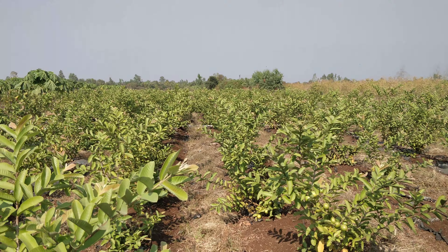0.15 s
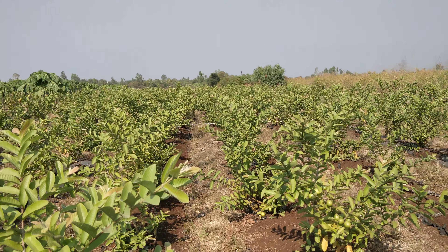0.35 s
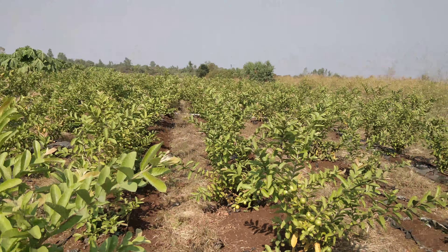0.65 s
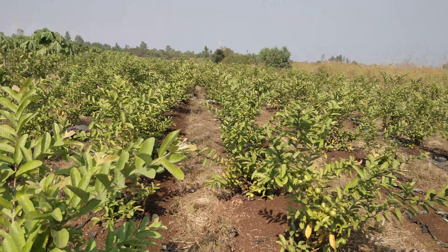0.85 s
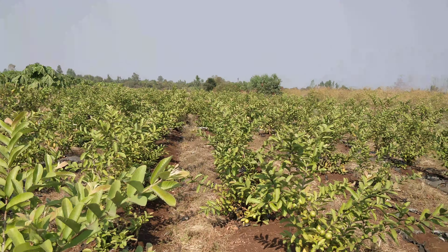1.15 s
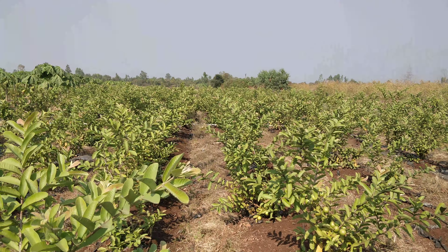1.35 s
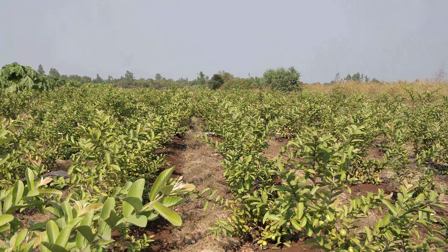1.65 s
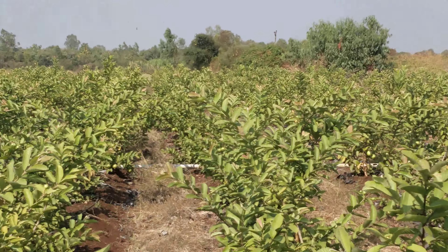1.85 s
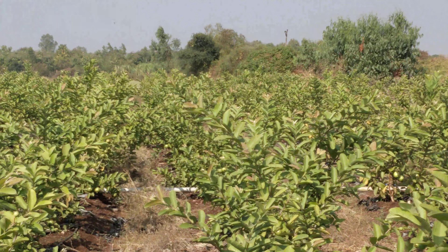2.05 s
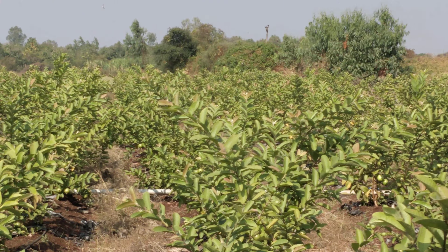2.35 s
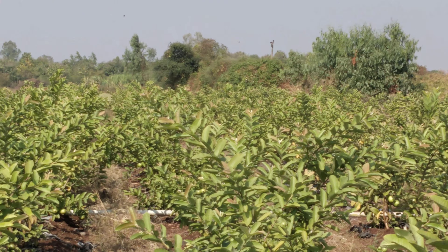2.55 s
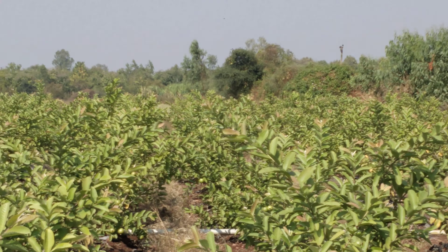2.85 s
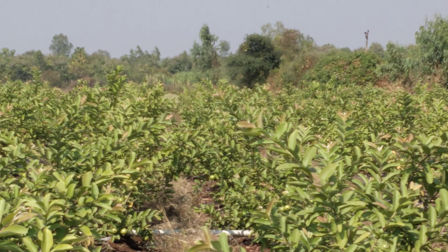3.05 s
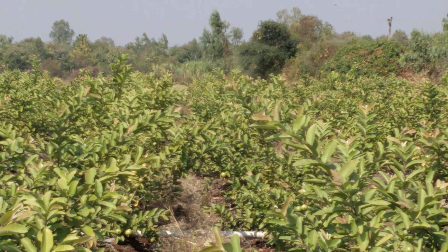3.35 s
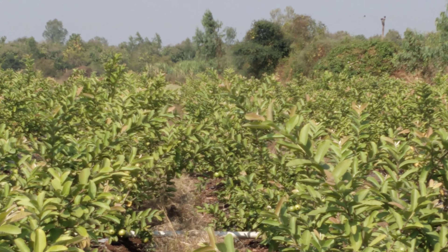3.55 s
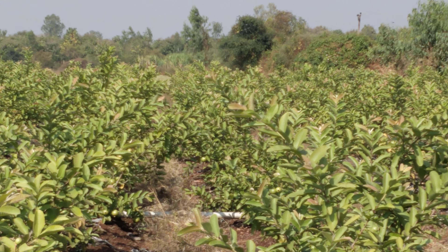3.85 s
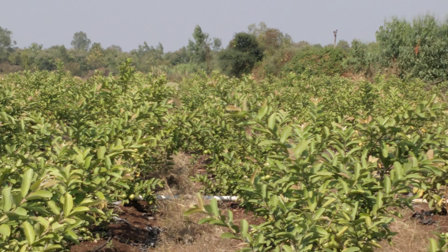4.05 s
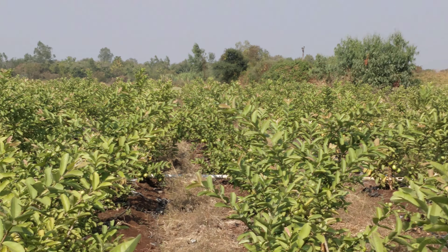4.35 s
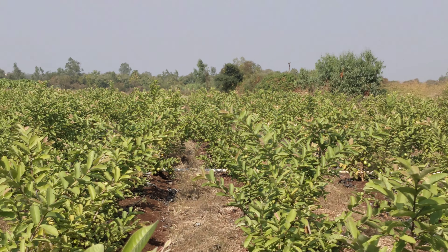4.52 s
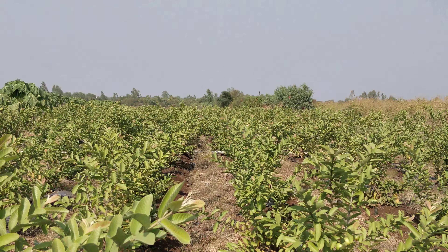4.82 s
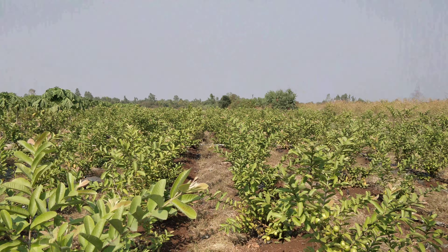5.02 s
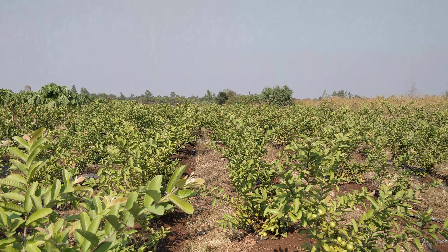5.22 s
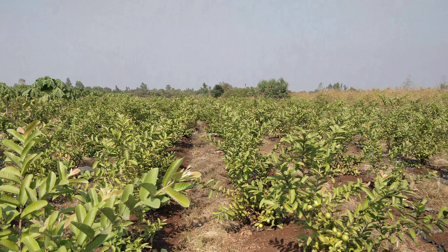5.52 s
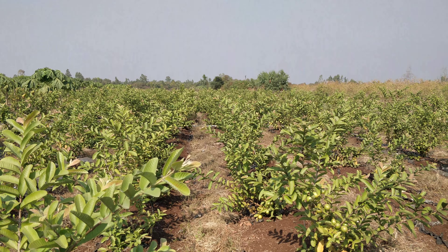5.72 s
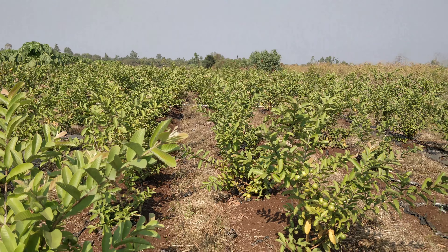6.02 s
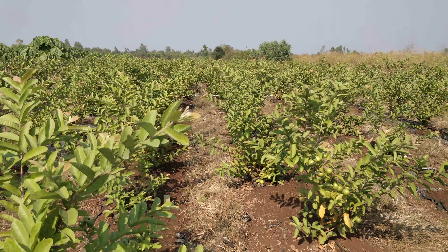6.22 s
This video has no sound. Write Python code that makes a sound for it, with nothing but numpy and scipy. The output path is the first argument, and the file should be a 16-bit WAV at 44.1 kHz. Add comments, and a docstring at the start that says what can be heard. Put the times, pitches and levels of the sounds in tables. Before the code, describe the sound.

A cricket chirps fast and very high on the right in a breezy field, after an opening burst of finger rubs and knocks on the phone.

```python
"""A cricket chirps in a dry field, close on the right of a hand-held phone: gliding tones, echoes and leaf scatter.
Fingers rub and tick on the case: banded grainy noise and short damped rings. Wind thumps the microphone
ports, mostly the left one: lumpy low noise and bell-shaped pulses. Small birds whistle short glides; other
crickets, steady air and a far drone of three noise bands fill the distance."""
import sys
import numpy as np
from scipy import signal
from scipy.fft import rfft, irfft, next_fast_len
from scipy.io import wavfile
from scipy.ndimage import uniform_filter1d, map_coordinates

SR = 44100
rng = np.random.default_rng(int(sys.argv[2]) if len(sys.argv) > 2 else 0)


def output_pcm(signal):
    """Save a mono or channel-first signal as 16-bit PCM at the path in sys.argv[1].

    Samples are clipped to [-1, 1] before scaling.
    """
    pcm = np.clip(np.atleast_2d(signal).T, -1, 1) * 32767
    wavfile.write(sys.argv[1], SR, np.round(pcm).astype(np.int16))


N = 281358  # samples


def amp(db):
    """Amplitude ratio of a level in dB."""
    return 10 ** (np.asarray(db) / 20)


def unit(x):
    """x scaled to rms 1 over all its channels."""
    return x / np.sqrt(np.mean(x ** 2) + 1e-20)


def along(points, hz):
    """(f/Hz, value) points interpolated on a log frequency axis."""
    f, v = np.transpose(points)
    return np.interp(np.log(hz + 1), np.log(f + 1), v)


def curves(rows):
    """One value per sample for each column after the time."""
    s, *cols = np.transpose(rows)
    return [np.interp(np.arange(N) / SR, s, c) for c in cols]


def wobble(rate_hz):
    """Smooth random curve, rate_hz knots a second."""
    knots = rng.standard_normal(int(N / SR * 400) + 4)
    return map_coordinates(knots, [np.arange(N) * rate_hz / SR])


def filtered(x, response):
    """x times a response of frequency."""
    m = next_fast_len(N + SR // 2)
    return irfft(rfft(x, m) * response(np.fft.rfftfreq(m, 1 / SR)), m)[..., :N]


def noise(spectrum, alike):
    """Stereo noise of rms 1; mid and side shares set the correlation; falls away outside the spectrum's points."""
    closed = [(spectrum[0][0] / 2, -90), *spectrum, (spectrum[-1][0] * 1.3, -90)]

    def mid_side(hz):
        turn = np.arccos(np.clip(along(alike, hz), -1, 1)) / 2
        return amp(along(closed, hz)) * [np.cos(turn), np.sin(turn)]

    mid, side = filtered(rng.standard_normal((2, N)), mid_side)
    return unit(np.array([mid + side, mid - side]))


def add(track, s, sound):
    """Mix a sound in at s seconds."""
    i = int(np.clip(round(s * SR), 0, N))
    track[..., i:i + sound.shape[-1]] += sound[..., :track.shape[-1] - i]


def foliage(x, t60_s):
    """Scattering from leaves and soil: decaying noise, different at each port, redrawn every sixth of a second."""
    t, step, out = np.arange(SR // 5) / SR, SR // 6, np.zeros((2, N))
    for i in range(0, N, step):
        tail = rng.standard_normal((2, len(t))) * amp(-60 * t / t60_s) * (t > .002)
        tail = tail / np.linalg.norm(tail[0])
        add(out, i / SR, signal.fftconvolve(x[:, i:i + step], tail, axes=1))
    return out


# One wing stroke, before pitch and stretch: t/s, f/Hz, level/dB
STROKE_GLIDE = [(0, 10250, -40), (.0015, 10100, -5), (.0068, 9760, 1.5), (.0085, 9450, -3),
                (.012, 9150, -6), (.015, 8600, -17), (.018, 8200, -40)]


def stroke(pitch, stretch):
    """One closing of the wings: a tone that swells, then falls in pitch and stutters as the scraper slows."""
    s, hz, db = np.transpose(STROKE_GLIDE)
    t = np.arange(0, s[-1], 1 / (SR * stretch))
    swell = uniform_filter1d(uniform_filter1d(amp(np.interp(t, s, db)), size=25), size=25)
    slips = map_coordinates(rng.standard_normal(20), [t * 850])
    stutter = 1 + np.clip((t - .007) / .003, 0, 1) * (.45 * slips - .4)
    phase = 2 * np.pi * np.cumsum(pitch * np.interp(t, s, hz)) / SR
    return np.sqrt(2) * swell * stutter * np.sin(phase)


# Near cricket's chirps: t/s, direct right level/dB
CHIRPS = [(0.0082, -52.5), (0.159, -51), (0.342, -54), (0.5167, -78), (0.688, -50), (0.859, -69),
          (1.026, -46), (1.1925, -46), (1.361, -42), (1.5342, -41.5), (1.703, -39.5), (1.8689, -42.5),
          (2.034, -43.5), (2.21, -43), (2.3796, -44.5), (2.55, -44.5), (2.7208, -47.5), (2.889, -46),
          (3.0596, -44), (3.225, -43), (3.3923, -44.5), (3.5667, -43.5), (3.7436, -42.5), (3.916, -43.5),
          (4.093, -44), (4.278, -43.5), (4.459, -42.5), (4.626, -43), (4.7961, -42.5), (4.962, -44),
          (5.1367, -42.5), (5.3051, -43), (5.4777, -42.5), (5.65, -43.5), (5.8166, -45.5), (5.9856, -42.5),
          (6.158, -46), (6.334, -49)]
# Wing strokes of a chirp: t after its start/s, relative level/dB
CHIRP_STROKES = [(0, 0), (.0255, 0), (.053, 0)]
# Soil and near leaves, before scatter: delay t/s, relative level/dB
ECHOES = [(.0036, -12), (0.0139, -13), (.019, -16)]
LEAVES_DB_PER_OCT = -27  # shrubs scatter the lower pitches best
SHADOW_DB_PER_OCT, SHADOW_PIVOT_HZ = -17, 9000  # phone's shadow at the left port


def cricket():
    """Three strokes a chirp; close echoes beat with the falling tone, and the phone shades the left port."""
    direct, scattered = np.zeros((2, 1, N))
    for s, db in CHIRPS:
        for after_s, stroke_db in CHIRP_STROKES:
            level = amp(stroke_db + 0.64 * rng.normal())
            one = level * stroke(1 + 0.0025 * rng.normal(), 1 + 0.075 * rng.normal())
            add(direct, s + after_s, amp(db) * one)
            # a hand in the way shades echoes less
            add(scattered, s + after_s, amp(-38.5 + 0.22 * (db + 46.0)) * one)
            for late_s, echo_db in ECHOES:
                echo_s = s + after_s + late_s * (1 + 0.025 * rng.normal())
                add(direct, echo_s, amp(db + echo_db + 2.2 * rng.normal()) * one)

    def octaves(hz, pivot_hz):
        return np.log2(np.clip(hz, 7000, 12000) / pivot_hz)

    scattered = filtered(scattered, lambda hz: amp(LEAVES_DB_PER_OCT * octaves(hz, 9800)))
    heard = amp([[-25], [0]]) * direct
    heard = heard + amp([[-32], [-12]]) * foliage(scattered, t60_s=.06)
    heard = heard + amp([[-36], [-18]]) * foliage(scattered, t60_s=0.29)
    return filtered(heard, lambda hz: amp([[SHADOW_DB_PER_OCT], [0]] * octaves(hz, SHADOW_PIVOT_HZ)))


def patchy(x, patch_db):
    """x with random patches of gain over pitch and time."""
    z = signal.stft(x, nperseg=256)[2]
    field = rng.standard_normal(z.shape[1:])
    field = uniform_filter1d(uniform_filter1d(field, size=7, axis=0), size=5, axis=1)
    return signal.istft(z * amp(patch_db * unit(field)), nperseg=256)[1][:, :N]


# Finger strokes, levels before the swell: t/s, attack t/s, hold t/s, release t/s, scrape f/Hz,
# scrape right level/dB, scrape left level/dB, boom f/Hz, boom tilt/(dB/octave), boom right level/dB,
# boom left level/dB, hiss right level/dB, hiss tilt/(dB/octave)
RUBS = [ (.236, 0.015, 0.0029, 0.027, 2500, -60, -51.5, 302, 2.5, -49.5, -49.5, -63.5, -7),
        (.275, 0.013, .005, 0.046, 2480, -60, -59, 300, 3.5, -55.5, -58.5, -77, 0),
        (0.365, 0.046, 0.044, 0.047, 3750, -27.5, -59, 1030, 2.5, -28, -49.5, -31.5, 4.5),
        (.49, 0.097, 0.031, 0.083, 2000, -59, -73, 610, -2.5, -43, -58.5, -59, -6.5),
        (.59, 0.04, .012, .02, 2200, -53.5, -65, 1200, -1, -40.5, -51.5, -57.5, -3.5),
        (0.669, 0.011, 0.0074, 0.11, 2480, -50.5, -58, 505, -1, -38.5, -48.5, -57, -3),
        (.75, 0.058, 0.034, 0.061, 5740, -41.5, -56, 404, -2.5, -37, -45, -36.5, -6),
        (.825, 0.021, 0.019, 0.043, 5230, -58, -67, 744, -3.5, -34.5, -41.5, -72, -3),
        (0.968, 0.07, 0.061, 0.044, 5100, -43.5, -64, 1010, 4.5, -42, -57, -48.5, 5),
        (.99, 0.034, 0.016, 0.05, 3000, -53, -75, 320, -5.5, -33, -57, -40.5, 6),
        (5.22, 0.093, 0.09, 0.08, 3930, -60, -78, 500, 7, -70, -72, -67.5, 7),
        (5.36, 0.11, 0.0072, 0.11, 3980, -55, -72, 500, 10, -65, -65, -62.5, 4),
        (5.928, 0.0074, 0.0091, 0.23, 4000, -58.5, -73, 500, -5, -65, -74, -66, -1),
        (6.0, 0.081, 0.01, 0.06, 4400, -57.5, -73, 300, -5, -60, -57.5, -64, -6),
        (6.088, 0.017, 0.066, 0.058, 2500, -62, -72, 506, -5, -42.5, -67, -71, 0),
        (6.1, 0.077, 0.011, 0.12, 4250, -48.5, -69, 290, 0, -43, -62, -57, 12),
        (6.24, 0.09, .05, .05, 4400, -41, -58, 895, 1, -36.5, -51.5, -48, 19)]
# Spectrum of skin scraping: f/Hz, relative level per Hz/dB
SCRAPE_SPECTRUM = [(900, -16), (2000, -5.5), (3000, -1.5), (4600, -1.5), (5300, 0.5), (5900, -13.5),
                   (8000, -10)]
# Spectrum of the case booming: f/Hz, relative level per Hz/dB
BOOM_SPECTRUM = [(60, -20), (150, -0.5), (300, 0.5), (800, -0.5), (1600, -5), (3000, -10.5), (5500, -44)]
# Spectrum of the hiss: f/Hz, relative level per Hz/dB
HISS_SPECTRUM = [(4500, -55), (6000, -9.5), (8500, -4), (10500, -10), (12000, -21), (15500, -39)]
TOUCH_DB, SHADE_DB = 20, 6  # swell depth; extra hiss loss at the left port
SKIN_DB, SKIN_OCTAVES, HISS_PIVOT_HZ = 7, 0.55, 9000  # scrape resonance height, width
BOOM_DB, BOOM_OCTAVES = -1, 0.57  # boom resonance height (negative: a dip), width
SNAPS_PER_S, SNAP_DB, SNAP_T60_S = 90, -4, 0.0086  # skin letting go


def rubbing():
    """Skin sticks and slips over the case: grainy noise of shifting colour in its scrape, boom and hiss bands."""
    t = np.arange(N) / SR
    grain = amp(0.37 * wobble(330) + 0.7 * wobble(60))
    snaps = rng.exponential(size=N) * (rng.random(N) < SNAPS_PER_S / SR)
    decay = amp(-60 * t[:SR // 100] / SNAP_T60_S)
    crackle = 1 + amp(SNAP_DB) * signal.fftconvolve(snaps, decay)[:N]

    def grainy(spectrum):
        return unit(grain * patchy(noise(spectrum, [(300, 0.031)]), patch_db=2.0))

    scrape = unit(crackle * grainy(SCRAPE_SPECTRUM))
    body = grainy(BOOM_SPECTRUM)
    hiss = unit(crackle * grainy(HISS_SPECTRUM))
    out = np.zeros((2, N))
    for k, row in enumerate(RUBS):
        s, attack_s, hold_s, release_s, skin_hz, right_db, left_db = row[:7]
        boom_hz, boom_tilt_db, right_boom_db, left_boom_db, hiss_db, hiss_tilt_db = row[7:]
        now = t[round(s * SR):round((s + attack_s + hold_s + release_s) * SR)] - s
        # 0 while held, towards 1 at both ends
        off = np.maximum(np.maximum(1 - now / attack_s, (now - attack_s - hold_s) / release_s), 0)
        start = k * N // len(RUBS)
        fresh = slice(start, start + len(now))  # each stroke takes its own stretch of noise
        hz = np.fft.rfftfreq(len(now), 1 / SR) + 1

        def tint(x, db):
            return unit(irfft(rfft(x[:, fresh]) * amp(db), len(now)))

        skin = tint(scrape, SKIN_DB * np.exp(-(np.log2(hz / skin_hz) / SKIN_OCTAVES) ** 2))
        fizz = tint(hiss, hiss_tilt_db * np.log2(hz / HISS_PIVOT_HZ))
        boom_octaves = np.log2(hz / boom_hz)
        resonance_db = BOOM_DB * np.exp(-(boom_octaves / BOOM_OCTAVES) ** 2)
        boom = tint(body, resonance_db + boom_tilt_db * boom_octaves)
        sound = amp([[left_db], [right_db]]) * skin
        sound = sound + amp([[left_boom_db], [right_boom_db]]) * boom
        sound = sound + amp([[hiss_db + left_db - right_db - SHADE_DB], [hiss_db]]) * fizz
        add(out, s, amp(-TOUCH_DB * off ** 2) * (1 - off ** 6) * sound)
    return out


# Nails and creaks on the case: t/s, left level/dB, right level/dB, ring f/Hz, t60/s, push relative level/dB
TICKS = [ (0.246, -33, -54, 2400, 0.012, -24), (0.253, -30.5, -51, 2640, 0.013, -20),
         (0.3646, -26, -12, 5100, 0.00066, -0.5), (0.372, -33, -17.5, 2420, 0.0028, -27),
         (0.4638, -11.5, 6.5, 1490, 0.00097, -13), (0.4733, -32, -4, 2020, 0.0017, -16),
         (0.4845, -22, -13.5, 1350, 0.002, -22), (.698, 1, -16, 3300, 0.0013, -28),
         (1.509, -28.5, -42, 1450, 0.0013, 4), (3.015, -50, -48, 3900, .002, -25),
         (5.28, -56, -44, 4200, 0.0025, -25), (5.464, -50, -40, 3900, 0.0053, -22),
         (5.488, -54, -42, 4300, .006, -29), (5.935, -54, -40, 3840, 0.0046, -25),
         (5.966, -54, -41, 3700, .004, -25), (6.056, -54, -45, 2630, .003, -20),
         (6.0857, -15.5, -31, 2840, 0.00094, -3)]


def ticks():
    """Each tick is a quick pull, a short damped ring of the case and a slower push on the port."""
    out, t = np.zeros((2, N)), np.arange(SR // 100) / SR
    for s, left_db, right_db, hz, t60_s, push_db in TICKS:
        onset = 1 - np.exp(-t / .00003)
        ring = -np.sin(2 * np.pi * hz * t) * amp(-60 * t / t60_s) * onset
        push = amp(push_db) * np.sin(2 * np.pi * 350 * t) * amp(-60 * t / 0.0032)
        add(out, s, amp([[left_db], [right_db]]) * (ring + push))
    return out


# Strongest eddies and finger pads on a port: t/s, nominal peak level/dB, f/Hz, port (0 left, 1 right)
THUMPS = [ (0.265, -42, 87.5, 1), (0.365, -28.5, 121, 0), (0.441, -15, 244, 1), (0.462, -34, 268, 0),
          (0.94, -27.5, 145, 1), (0.948, -34, 145, 1), (0.958, -24, 149, 1), (1.029, -23, 313, 1),
          (1.085, -32.5, 180, 0), (1.104, -34, 290, 1), (1.136, -34.5, 129, 0), (1.328, -34.5, 213, 1),
          (1.427, -31.5, 199, 1), (2.089, -35, 114, 0), (2.839, -36.5, 143, 0), (2.926, -27, 151, 0),
          (2.976, -30, 141, 0), (3.109, -32, 160, 0), (3.503, -43.5, 129, 0), (3.554, -36, 106, 0),
          (3.574, -28.5, 118, 0), (3.258, -40.5, 121, 0), (3.764, -35, 102, 0), (3.859, -35.5, 134, 0),
          (3.943, -41, 92.5, 0), (3.991, -33.5, 121, 0), (4.339, -41.5, 152, 0), (4.395, -37, 173, 0),
          (4.467, -36, 147, 0), (4.526, -39.5, 162, 0), (4.544, -42, 277, 0), (4.567, -28, 213, 0),
          (4.599, -24, 194, 0), (4.615, -29, 153, 0), (4.677, -38.5, 186, 0), (4.826, -39, 110, 0),
          (5.265, -36, 90, 0), (5.287, -29, 169, 0), (5.341, -37, 112, 0), (5.611, -33, 155, 0),
          (5.845, -34.5, 162, 0), (5.873, -42, 109, 0), (6.04, -32.5, 131, 0), (6.09, -33.5, 230, 1),
          (6.296, -33.5, 143, 0), (6.317, -30, 112, 0)]
# Buffeting: t/s, left level/dB, right level/dB
BUFFETING = [(0, -54, -62), (.3, -54.5, -41.5), (.55, -51, -41), (.87, -66, -54), (1.25, -48.5, -63),
             (1.74, -63, -51), (2.1, -52.5, -60), (2.85, -52.5, -50), (3.2, -51.5, -62), (3.6, -58, -58),
             (4.06, -52.5, -54), (4.6, -47.5, -54), (4.95, -62, -60), (5.75, -53, -63.5), (6.09, -59, -71),
             (6.38, -50, -68)]
# Spectrum of the buffeting: f/Hz, relative level per Hz/dB
RUMBLE_SPECTRUM = [(15, -12), (30, 6.5), (70, -1.5), (120, -7), (200, -17.5), (500, -39.5)]
# Small eddies, left port: top level over the buffeting, random drop, lowest pitch, random rise
EDDY_DB, EDDY_SPREAD_DB, EDDY_HZ, EDDY_SPREAD_HZ = -8, 15, 101, 82
# Flutter around each thump: level re its peak, 1/e half width in power, high-pass corner
FLUTTER_DB, FLUTTER_S, FLUTTER_HZ = -19, 0.023, 93.5


def wind():
    """Lumpy buffeting, almost unrelated between ports, and single thumps of a cycle or two that stir flutter."""
    slow_db = 3.5 * np.array([wobble(12), wobble(9.5)])
    fast_db = 3.6 * np.array([wobble(45), wobble(40)])
    buffet_db = curves(BUFFETING)
    stir = np.zeros((2, N))  # flutter power
    around = np.arange(-SR // 8, SR // 8) / SR
    for s, peak_db, _, port in THUMPS:
        power = amp(peak_db + FLUTTER_DB) ** 2 * np.exp(-(around / FLUTTER_S) ** 2)
        add(stir[int(round(port))], s + around[0], power)
    buffet = unit(amp(slow_db + fast_db) * noise(RUMBLE_SPECTRUM, [(30, 0.033)]))
    flutter = filtered(noise(RUMBLE_SPECTRUM, [(30, 0)]), lambda hz: hz ** 2 / (hz ** 2 + FLUTTER_HZ ** 2))
    out = amp(buffet_db) * buffet + np.sqrt(stir) * unit(flutter)
    eddies = []
    for when, soft, high in rng.random(size=(30, 3)):
        peak_db = buffet_db[0][int(when * N)] + EDDY_DB - EDDY_SPREAD_DB * soft
        eddies.append((when * N / SR, peak_db, EDDY_HZ + EDDY_SPREAD_HZ * high, 0))
    t = np.arange(-SR // 25, SR // 25) / SR
    for s, peak_db, hz, port in THUMPS + eddies:
        swing = np.cos(2 * np.pi * (hz * t + rng.random()))
        swing = swing + 0.21 * np.cos(2 * np.pi * (1.93 * hz * t + rng.random()))
        bell = np.exp(-(t * hz / 0.5) ** 2)
        pulse = bell * (swing - np.average(swing, weights=bell))  # no net push
        add(out[int(round(port))], s + t[0], amp(peak_db) * pulse)
    return out


# Notes, level before port gains: t/s, length t/s, start f/Hz, middle f/Hz, end f/Hz, level/dB
BIRD_NOTES = [ (1.30, 0.081, 2216, 2760, 3730, -69.5), (1.378, 0.067, 3950, 4360, 4800, -64.5),
              (1.428, 0.021, 4700, 4810, 4700, -66), (1.56, 0.028, 2510, 3160, 3700, -63.5),
              (1.6, 0.088, 3700, 3970, 4080, -75), (1.775, 0.028, 4820, 3710, 2310, -65),
              (1.79, 0.019, 3240, 3150, 2820, -61.5), (1.81, 0.062, 3500, 3840, 3930, -69),
              (1.819, 0.027, 2370, 2630, 2450, -62), (1.88, 0.025, 3880, 3190, 2050, -63.5),
              (2.13, 0.032, 3800, 3980, 3900, -73), (2.172, 0.021, 3390, 3160, 2900, -68),
              (2.6, 0.023, 2070, 1940, 1990, -68), (2.68, 0.057, 2055, 2010, 2350, -69),
              (2.755, .03, 2140, 1850, 1850, -67.5), (2.801, 0.0082, 2470, 2400, 2390, -61.5),
              (2.86, .05, 2700, 2490, 2290, -71), (3.02, 0.012, 3700, 3640, 3620, -66),
              (3.058, 0.034, 2840, 2350, 1900, -67.5), (4.104, 0.034, 2520, 2580, 2720, -70),
              (4.76, 0.051, 2477, 2480, 2480, -65.5), (4.826, 0.04, 2450, 2506, 2460, -66.5),
              (5.369, 0.032, 1840, 1976, 2100, -61.5), (5.893, 0.02, 2780, 2525, 2050, -64.5),
              (6.05, 0.021, 2580, 2720, 2570, -58)]


def birds():
    """Short whistled glides that flicker through the leaves, half lost in their echoes."""
    out = np.zeros((1, N))
    for s, length_s, start_hz, middle_hz, end_hz, db in BIRD_NOTES:
        u = np.linspace(-1, 1, round(length_s * SR))
        bend_hz = (start_hz + end_hz) / 2 - middle_hz
        hz = middle_hz + (end_hz - start_hz) / 2 * u + bend_hz * u * u
        add(out, s, amp(db) * np.sqrt(1 - u ** 4) * np.sin(2 * np.pi * np.cumsum(hz) / SR))
    flicker = amp(2.5 * np.array([wobble(90), wobble(90)]))
    return amp([[-1.5], [-4]]) * flicker * out + amp([[0], [2]]) * foliage(out, t60_s=0.12)


# Second cricket farther off, before scatter: t/s, right level/dB
NEIGHBOUR_CHIRPS = [ (0.279, -56.5), (1.47, -75), (1.627, -63), (1.808, -62), (1.982, -59), (2.152, -59),
                    (2.807, -58), (2.969, -58.5), (3.175, -63), (3.822, -64), (4.018, -62.5), (4.19, -62),
                    (4.383, -62), (5.267, -60), (5.429, -59), (6.087, -63), (6.235, -71)]
# Far crickets together: t/s, right level/dB
CHORUS_LEVEL = [(0, -61.5), (2.5, -66), (5, -67.5), (6.38, -62.5)]


def chorus():
    """A neighbour, and scattered chirps of still farther crickets, lower in pitch and blurred by the shrubs."""
    near, far = np.zeros((2, 1, N))
    for s, db in NEIGHBOUR_CHIRPS:
        for after_s in (0, .029, .059):
            level = amp(db + 0.26 * rng.normal())
            add(near, s + after_s, level * stroke(.955 + 0.0081 * rng.normal(), 1.1))
    for when, high, loud in rng.random(size=(270, 3)):
        for after_s, _ in CHIRP_STROKES:
            add(far, when * N / SR + after_s, amp(5 * loud) * stroke(.85 + .15 * high, 1.1))
    blurred = amp(curves(CHORUS_LEVEL)[0]) * unit(foliage(far, t60_s=0.22))
    heard = near + foliage(near, t60_s=0.041) + blurred
    return amp([[-20], [0]]) * heard


# Spectrum of the field's air: f/Hz, relative level per Hz/dB
AIR_SPECTRUM = [(150, -4), (300, -6), (700, -6), (1700, -7.5), (3000, -8.5), (4900, -10.5), (5700, -17.5),
                (7500, -20), (10500, -20.5), (12000, -25.5), (15000, -26.5), (16000, -62)]
# Balance of the air: f/Hz, left minus right level/dB
AIR_PAN = [(300, -4.5), (1300, -2), (4400, -5), (7000, -1.5), (15000, 3.5)]
# Left-right likeness of the air: f/Hz, correlation/1
AIR_ALIKE = [(200, 0.47), (700, 0.72), (1300, 0.36), (2400, 0.075), (8000, 0.01)]
# Bands of the far drone: centre f/Hz, 1/e half width f/Hz, relative level/dB
DRONE_BANDS = [(528, 68, -5), (900, 134, -3), (1304, 220, -7.5)]
# Far drone, before wobble and port gains: t/s, level/dB, brightness from band to band/dB
DRONE_LEVEL = [(0, -71, 8.5), (.4, -75, 9.5), (1.2, -70, 0.5), (1.9, -69, 4.5), (2.5, -75.5, 10),
               (3.2, -77, -1), (4.8, -77, 9.5), (6.38, -76, 4)]


def distance():
    """The steady air of the field and a far drone in three blurred bands, reaching the left port first."""
    halves = np.array([[.5], [-.5]])
    air = filtered(noise(AIR_SPECTRUM, AIR_ALIKE), lambda hz: amp(along(AIR_PAN, hz) * halves))
    out = amp(-66.0) * amp(.4 * wobble(3)) * air
    level_db, bright_db = curves(DRONE_LEVEL)
    for k, (centre_hz, width_hz, db) in enumerate(DRONE_BANDS):
        hum = noise([(300, 0), (2000, 0)], [(500, 0.7), (1400, 0.97)])
        band = filtered(hum, lambda hz: np.exp(-((hz - centre_hz) / width_hz) ** 2))
        band_db = level_db + db + (k - 1) * bright_db + wobble(10)
        out += amp(band_db + np.array([[1.5], [4]])) * unit(band)
    delay_s = np.array([[0], [.00011]])
    return filtered(out, lambda hz: np.exp(-2j * np.pi * hz * delay_s))


def scene():
    """All sources, main to background."""
    return cricket() + rubbing() + ticks() + wind() + birds() + chorus() + distance()


TOP_HZ = 15750


def record(dry):
    """The phone keeps nothing above its band limit."""
    return filtered(dry, lambda hz: hz < TOP_HZ)


dry = scene()
out = record(dry)
output_pcm(out)
```